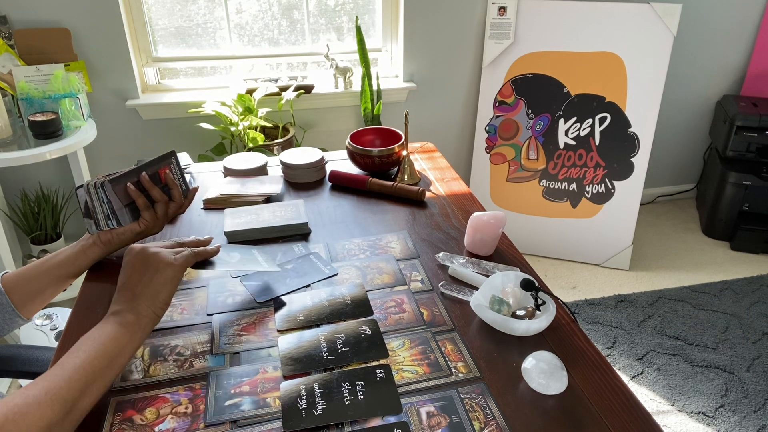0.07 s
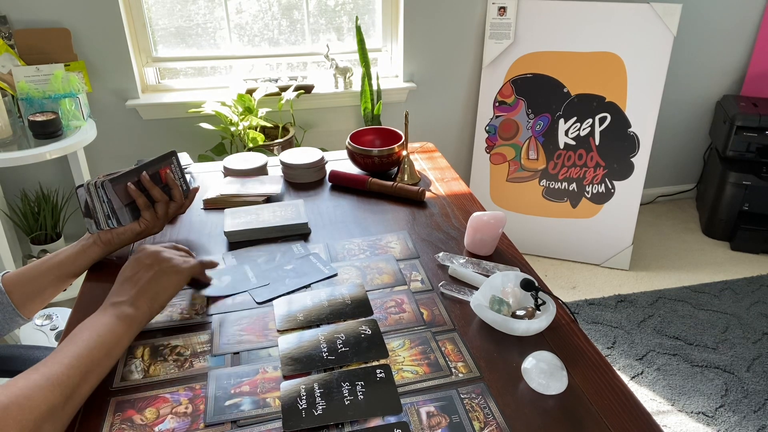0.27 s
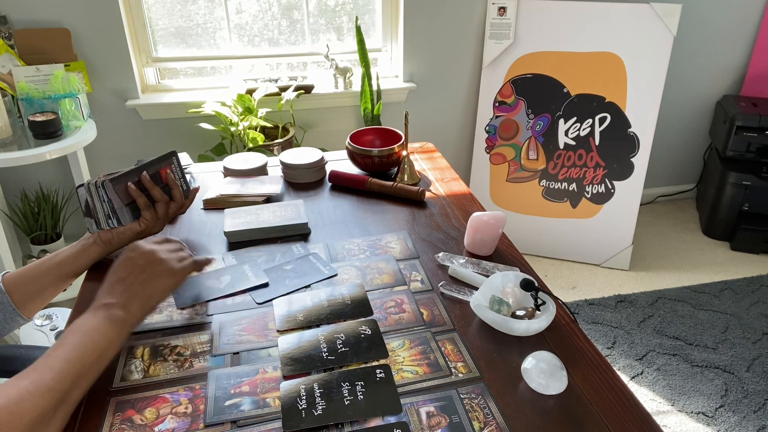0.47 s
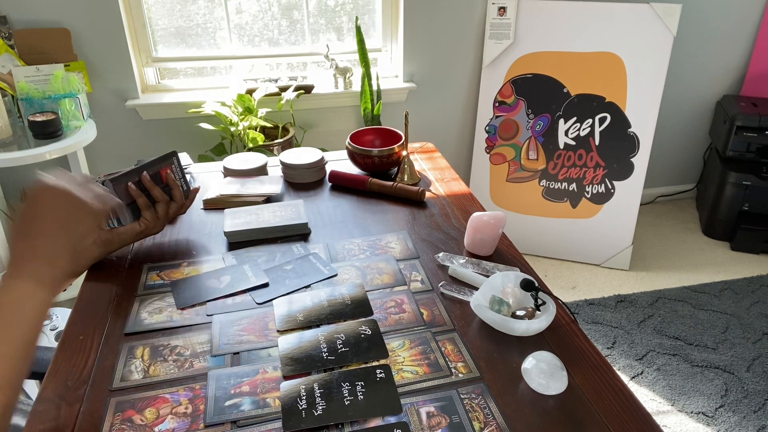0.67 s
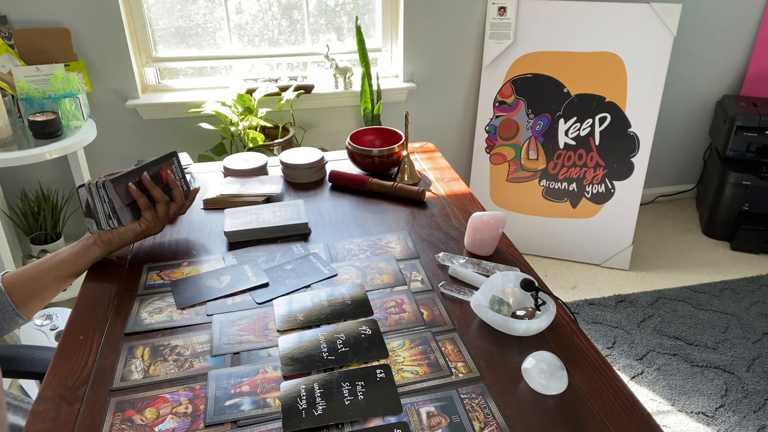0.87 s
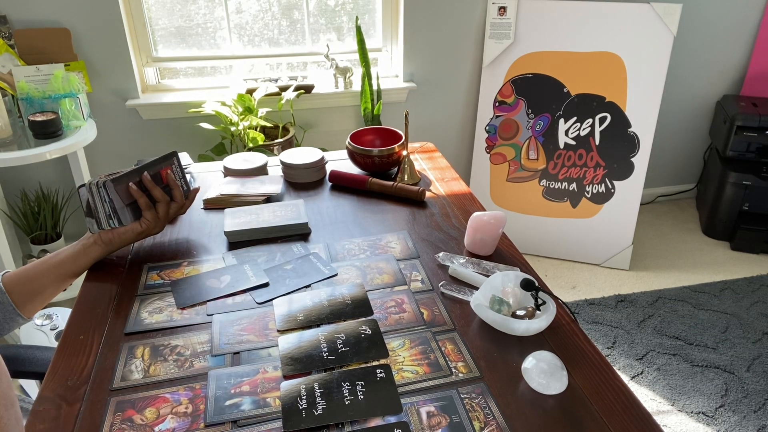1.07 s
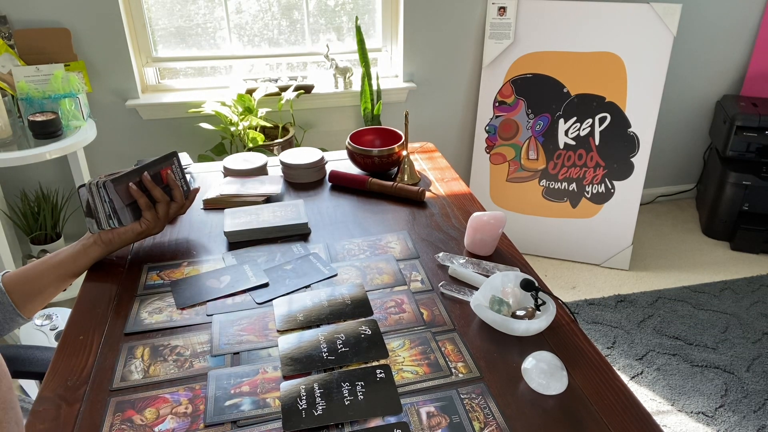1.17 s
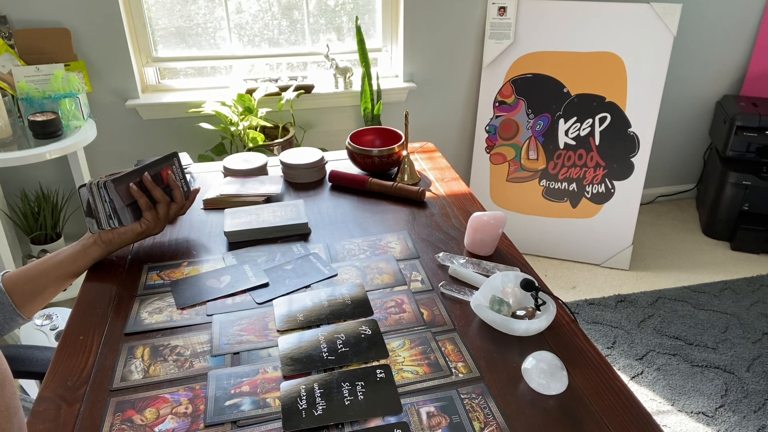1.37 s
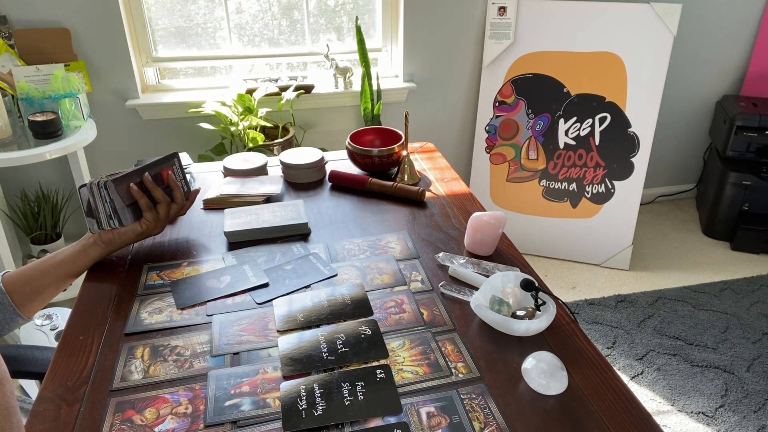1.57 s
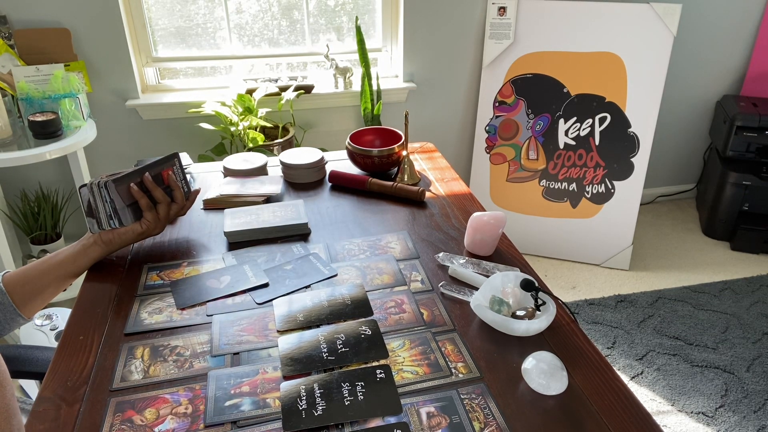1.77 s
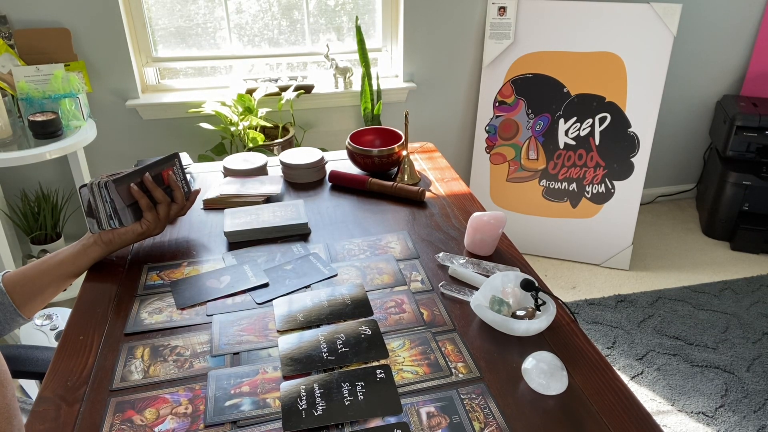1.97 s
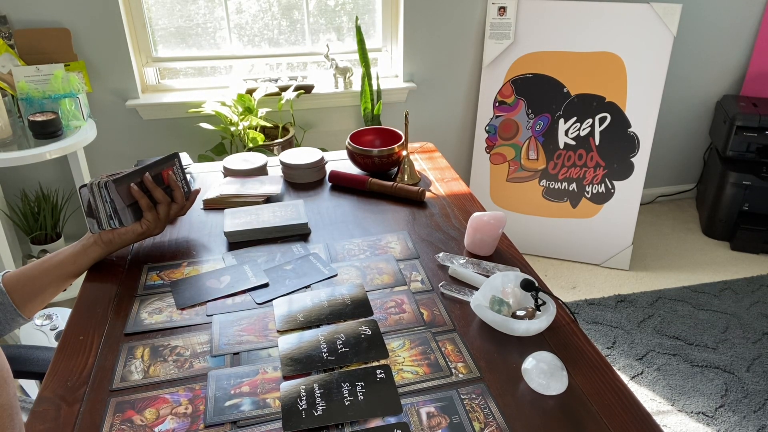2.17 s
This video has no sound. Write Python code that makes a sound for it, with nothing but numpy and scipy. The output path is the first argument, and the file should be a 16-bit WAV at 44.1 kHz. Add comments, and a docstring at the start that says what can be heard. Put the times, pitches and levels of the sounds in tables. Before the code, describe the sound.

A brief papery swish and small ticks lead to one sharp card slap on a wooden table, then near quiet with a light wood knock, faint bird whistles and low rumble; close single microphone, small room.

```python
"""A playing card is snapped down on a wooden table in a small quiet room: five pushes ring card and table top.
Around it the card swishes as grainy noise, card edges tick as short noise bursts and wood knocks once.
Reflections and a decaying diffuse field place these sounds in the room.
Behind lie gliding bird whistles outside the window, deep thuds of air, rumble and a ventilation hum.
One channel, as from a single microphone."""
import sys
import numpy as np
from scipy import signal
from scipy.fft import rfft, irfft
from scipy.io import wavfile

SR = 44100
rng = np.random.default_rng(int(sys.argv[2]) if len(sys.argv) > 2 else 0)


def inscribe(sig):
    """Save sig as 16-bit PCM at rate SR to the path in sys.argv[1].

    A 1-D sig is mono; a 2-D sig holds one channel per row.
    Samples are clipped to [-1, 1] before scaling.
    """
    pcm = np.round(np.clip(np.atleast_2d(sig).T, -1, 1) * 32767)
    wavfile.write(sys.argv[1], SR, pcm.astype(np.int16))


N = 98166
T = np.arange(N) / SR  # s


def from_db(db):
    """Decibels to gain."""
    return 10 ** (np.asarray(db) / 20)


def rms_one(x):
    """Scale to unit level."""
    return x / np.sqrt(np.mean(x ** 2) + 1e-20)


def at_hz(points, hz, axis=1):
    """Read a column of a table on a log-frequency axis."""
    p = np.array(points)
    return np.interp(np.log(np.maximum(hz, 1)), np.log(p[:, 0]), p[:, axis])


def cut(x, hz, kind="low", order=2):
    """Butterworth low- or high-pass."""
    sos = signal.butter(order, min(hz, .45 * SR), kind, fs=SR, output="sos")
    return signal.sosfilt(sos, x + 1e-18)  # the tiny offset avoids slow denormal numbers


def noise(colour):
    """Noise with a given spectrum, unit level."""
    hz = np.arange(N // 2 + 1) * SR / N
    white = rfft(rng.standard_normal(N))
    return rms_one(irfft(white * from_db(at_hz(colour, hz)), N))


def drift(corner_hz):
    """Random wander at unit level, weakening above its corner."""
    hz = np.arange(N // 2 + 1) * SR / N
    white = rfft(rng.standard_normal(N))
    return rms_one(irfft(white / (1 + (hz / corner_hz) ** 2), N))


def dying(s, t60):
    """Envelope that jumps up at s and falls 60 dB in t60 seconds."""
    return (T >= s) * np.exp(-np.log(1000) * np.clip((T - s) / t60, 0, 10))


def burst(source, s, t60):
    """A dying burst of the source with unit energy."""
    return rms_one(source * dying(s, t60)) / np.sqrt(N)


def contact(s, db, corner_hz):
    """One push; the softer the contact, the lower its corner."""
    impulse = from_db(db) * (np.arange(N) == int(s * SR))
    softened = cut(impulse, corner_hz, order=1)
    return cut(softened, 2 * corner_hz, order=1)


def ring(force, modes):
    """Damped modes driven by a force, each a two-pole resonator."""
    out = np.zeros(N)
    for hz, db, t60 in modes:
        r = np.exp(-np.log(1000) / (t60 * SR))
        w = 2 * np.pi * hz / SR
        mode = signal.lfilter([0, np.sin(w)], [1, -2 * r * np.cos(w), r * r], force + 1e-18)
        out += from_db(db) * mode
    return out


# The card meets the table, edge first, then flat: t/s, force level/dB, contact corner f/Hz,
# table drive level/dB, card drive level/dB, crackle level/dB (the last three relative to the force)
SLAPS = [(0.3150, 9.5, 2399, 13.5, -6.5, -15), (0.3187, 8, 800, 9.5, 1, -11),
         (0.3202, 0, 1600, -3.5, 11.5, -13), (0.3220, -6, 13980, 8.5, 13.5, 8),
         (0.3223, 2, 5020, 5, -1.5, -4.5)]
# Ringing of the card: f/Hz, level/dB, t60/s
CARD = [(1177, -44, 0.0088), (1965, -29, .016), (2450, -26.5, 0.0092), (3275, -28, .007),
        (4336, -28.5, .007), (5700, -23.5, .006), (9500, -15.5, .003)]
# Ringing of the table top: f/Hz, level/dB, t60/s
TABLE = [(101, -64.5, .3), (176, -52, 0.03), (213.4, -46.5, 0.086), (431.6, -58.5, 0.25),
         (495, -51.5, 0.088), (672, -54, 0.21), (756, -58, 0.28), (876, -62, .17), (1160, -64, .14),
         (1940, -66.5, .24), (2080, -57, .27), (2268, -67, 0.2)]
CRACKLE_T60_S, CRACKLE_LOW_HZ = .02, 907.6


def slap():
    """Five quick contacts set card and table ringing; the card's face crackles as it flattens."""
    direct, on_table, on_card = 0, 0, 0
    for s, db, corner_hz, table_db, card_db, crackle_db in SLAPS:
        push = contact(s, db, corner_hz)
        grit = cut(rng.standard_normal(N), CRACKLE_LOW_HZ, "high")
        crackle = cut(burst(grit, s, CRACKLE_T60_S), 2 * corner_hz, order=1)
        direct = direct + push + from_db(db + crackle_db) * crackle
        on_table = on_table + from_db(table_db) * push
        on_card = on_card + from_db(card_db) * push
    return cut(direct + ring(on_table, TABLE) + ring(on_card, CARD), hz=70.97, kind="high")


# The card sliding: start t/s, peak t/s, end t/s, level/dB
SLIDES = [(0.186, 0.215, 0.29, -60.5), (0.237, 0.28, 0.325, -53.5), (0.295, 0.311, 0.35, -38.5),
          (2.093, 2.138, 2.19, -66), (2.17, 2.208, 3.4, -68)]
# Colour of the friction noise: f/Hz, relative level/dB
SLIDE_COLOUR = [(200, -7), (900, -2), (1700, 3.5), (2900, 0.5), (4200, -6.5), (7000, -6.5), (10000, -16.5),
                (16000, -22)]
SLIDE_GRAIN_DB, SLIDE_GRAIN_HZ = 1.5, 250  # depth and corner of the random grain


def slides():
    """Grainy friction that swells with the card's speed."""
    level = 0
    for start, peak, end, db in SLIDES:
        speed = np.interp(T, [start, peak, end], [0, 1, 0])
        level = level + from_db(db) * speed ** 2
    grain = from_db(SLIDE_GRAIN_DB * drift(SLIDE_GRAIN_HZ))
    return level * rms_one(noise(SLIDE_COLOUR) * grain)


# Thin ticks of card on card: t/s, level/dB, low-pass corner f/Hz
TICKS = [(0.2014, -23, 3526), (0.2065, -33.5, 9000), (0.2352, -24.5, 800), (0.2782, -12, 1100),
         (0.2844, -18.5, 3950), (0.3091, -13.5, 2202), (1.9874, -31.5, 8840), (2.074, -44, 4000)]
# Colour shared by the ticks: f/Hz, relative level/dB
TICK_COLOUR = [(300, -12), (1300, -7), (2300, 4.5), (3200, -5.5), (4400, -15), (6500, -2.5), (9000, -6),
               (11000, -10), (16000, -15.5)]
TICK_T60_S = .014


def ticks():
    """Card edges flick past each other in short bursts of coloured noise."""
    grain = noise(TICK_COLOUR)
    out = 0
    for s, db, hz in TICKS:
        out = out + from_db(db) * cut(burst(grain, s, TICK_T60_S), hz, order=1)
    return out


# Ringing of the knocked wood: f/Hz, level/dB, t60/s
KNOCK_MODES = [(530, -32.5, 0.063), (683, -23, 0.011), (930, -26, 0.015), (2340, -29.5, 0.013)]


def knock():
    """A light, dull knock: one soft push rings a small piece of wood."""
    return ring(contact(s=1.3430, db=-18.5, corner_hz=1353), KNOCK_MODES)


# Near surfaces: delay t/s, level/dB (about 3 m of extra path)
ECHOES = [(.0089, -13), (0.0096, -16)]
ECHO_LOW_HZ, ECHO_CUT_HZ = 1200, 7800


def echoes(x):
    """Distinct reflections off small objects nearby, which pass over the bass."""
    reflected = sum(from_db(db) * np.interp(T - delay, T, x, left=0) for delay, db in ECHOES)
    return cut(cut(reflected, ECHO_CUT_HZ), ECHO_LOW_HZ, "high", order=1)


# The small room: f/Hz, reverberation level/dB, t60/s
ROOM = [(100, -8.5, .3), (248.7, -8, .29), (590, -7, 0.39), (1100, -7.5, 0.36), (2100, -7.5, .39),
        (3360, -6.5, 0.35), (5770, -.5, 0.31), (9600, -9, .27), (14870, -11.5, .22)]
ROOM_DELAY_S, ROOM_BUILD_S = 0.0022, 0.0034
EARLY_DB, EARLY_T60_S = 3, 0.0868


def room(x):
    """Diffuse sound: each third of an octave stores the energy fed to it and lets it die, quickly at first."""
    out = 0
    edges = np.geomspace(70, 18000, 25)  # Hz
    white = rng.standard_normal((2, N))  # neighbouring bands take different noise
    build = 1 - np.exp(-np.maximum(T - ROOM_DELAY_S, 0) / ROOM_BUILD_S)
    early = from_db(EARLY_DB) * dying(0, EARLY_T60_S)
    for k, (low, high) in enumerate(zip(edges, edges[1:])):
        hz = np.sqrt(low * high)
        band = signal.butter(2, [low, high], "band", fs=SR, output="sos")
        late = dying(0, at_hz(ROOM, hz, axis=2))
        decay = (build * (early + late)) ** 2
        power = signal.sosfilt(band, x + 1e-18) ** 2
        stored = signal.fftconvolve(power, decay / decay.sum())[:N]
        carrier = rms_one(signal.sosfilt(band, white[k % 2]))
        out = out + from_db(at_hz(ROOM, hz)) * np.sqrt(np.maximum(stored, 0)) * carrier
    return out


# Falling bird whistles outside the window: t/s, length t/s, start f/Hz, end f/Hz, starting level/dB
WHISTLES = [(0.0, 0.15, 2855, 2480, -65), (0.556, 0.19, 2838, 2370, -64), (0.79, 0.072, 2157, 2060, -64.5),
            (1.01, .11, 2870, 2310, -63.5), (1.501, 0.064, 3335, 2865, -70),
            (1.554, 0.085, 2450, 2390, -66)]
BIRD_WAVER_HZ, BIRD_ECHO_T60_S = 33.4, .3
WHISTLE_DROOP = 1.6  # 1 = a straight fall, more = holds first
WHISTLE_FADE_DB = 6  # each whistle fades as it falls


def bird():
    """Thin whistles that hold, then droop and fade, smeared by echoes outdoors."""
    out = 0
    waver = BIRD_WAVER_HZ * drift(40)
    for s, length, start_hz, end_hz, db in WHISTLES:
        u = np.clip((T - s) / length, 0, 1)  # progress through the whistle
        hz = start_hz + (end_hz - start_hz) * u ** WHISTLE_DROOP + waver
        level = from_db(db - WHISTLE_FADE_DB * u) * np.sqrt(abs(np.sin(np.pi * u)))
        out = out + level * np.sin(2 * np.pi * np.cumsum(hz) / SR)
    outdoors = burst(rng.standard_normal(N), 0, BIRD_ECHO_T60_S)
    return .5 * out + signal.fftconvolve(out, outdoors)[:N]


# Deep thuds of moving air: t/s, level/dB, f/Hz, length t/s
THUDS = [(0.276, -33, 34.3, 0.18), (0.977, -31.5, 38, 0.059), (0.996, -24.5, 24.62, 0.15)]


def thuds():
    """A few slow swings of air pressure, each a low sine under a smooth hump."""
    out = 0
    for s, db, hz, length in THUDS:
        hump = np.sin(np.pi * np.clip((T - s) / length, 0, 1)) ** 2
        out = out + from_db(db) * hump * np.sin(2 * np.pi * hz * (T - s))
    return out


# Colour of the room's air noise: f/Hz, relative level/dB
AIR = [(15, 8), (30, -0.5), (48, -17.5), (70, -22), (130, -30.5), (210, -28.5), (320, -33.5), (420, -43),
       (800, -40), (1500, -49), (2300, -53), (2850, -52), (3200, -59), (8000, -61), (16000, -70.5)]
# Ventilation tones: f/Hz, level/dB
HUM = [(98, -66), (251, -58.5), (304, -65), (345, -69.5)]
AIR_LOW_DB, AIR_DB, AIR_SPLIT_HZ = -38.5, -58.5, 85  # rumble below the split, hiss above
HUM_WANDER_HZ = 4.4


def background():
    """Rumble, soft air noise and fan tones whose level and phase wander."""
    air = noise(AIR)
    rumble = rms_one(cut(air, AIR_SPLIT_HZ, order=4))
    hiss = rms_one(cut(air, AIR_SPLIT_HZ, "high", order=4))
    hum = 0
    for hz, db in HUM:
        phase = 2 * np.pi * hz * T
        tone = drift(HUM_WANDER_HZ) * np.sin(phase) + drift(HUM_WANDER_HZ) * np.cos(phase)
        hum = hum + from_db(db) * rms_one(tone)
    return from_db(AIR_LOW_DB) * rumble + from_db(AIR_DB) * hiss + hum


def scene():
    """Card and wood sounds with their reflections, over the quiet background."""
    close = slap() + slides() + ticks() + knock()
    return (close + echoes(close) + room(close) + bird() + thuds() + background())[None]


def record(dry):
    """The top is cut at 16 kHz by a linear-phase low-pass."""
    low_pass = signal.firwin(201, 16000, window="blackman", fs=SR)
    return signal.fftconvolve(dry, low_pass[None], "same")


dry = scene()
out = record(dry)
inscribe(out)
```